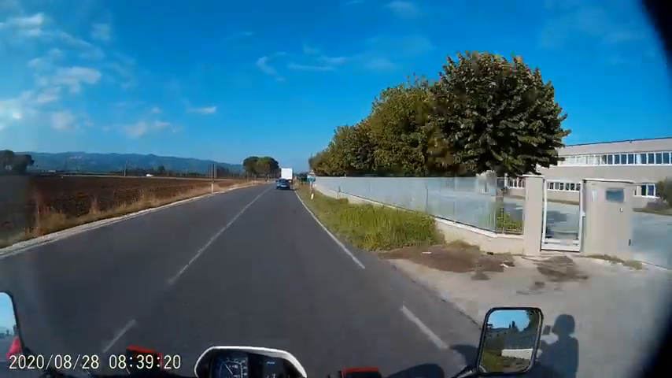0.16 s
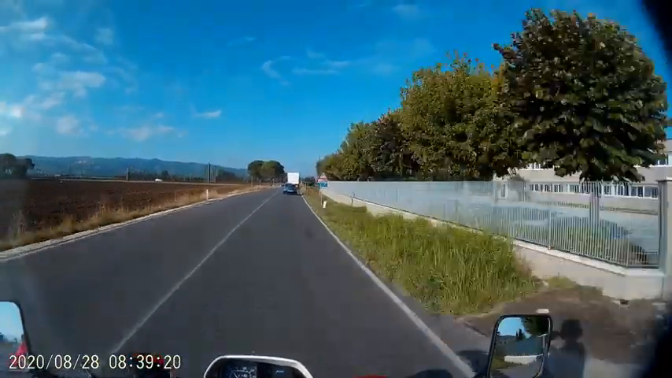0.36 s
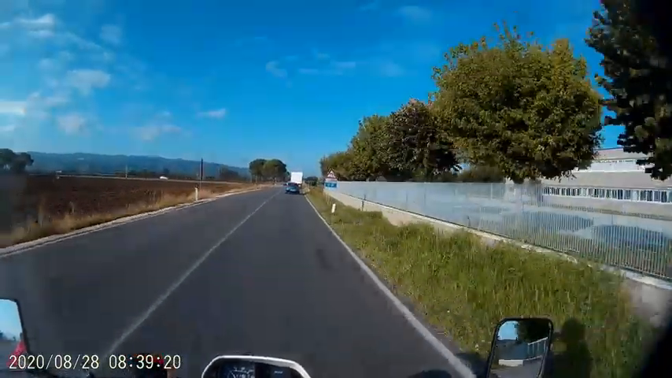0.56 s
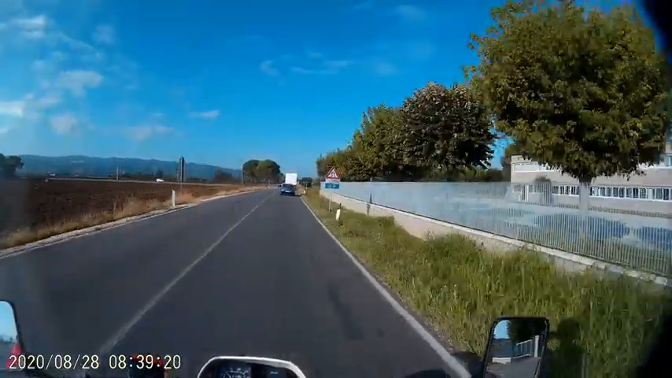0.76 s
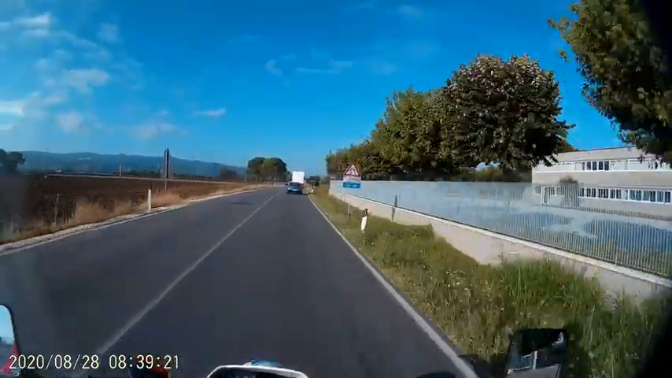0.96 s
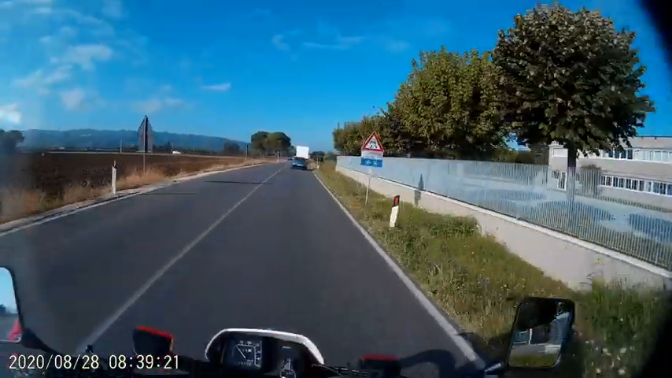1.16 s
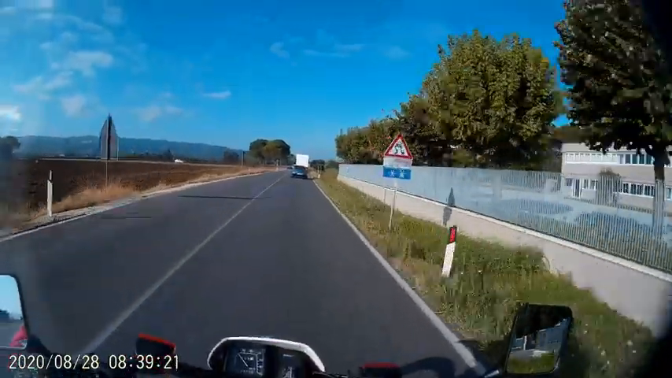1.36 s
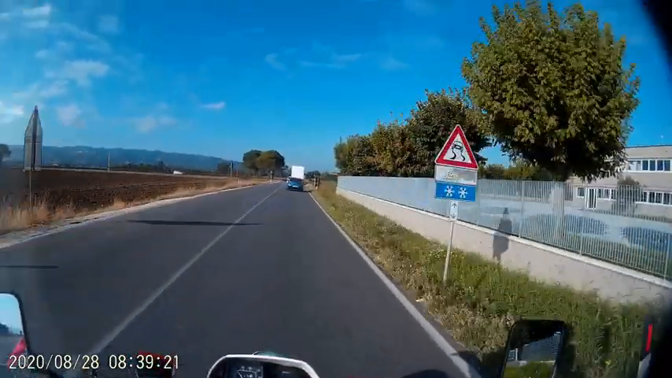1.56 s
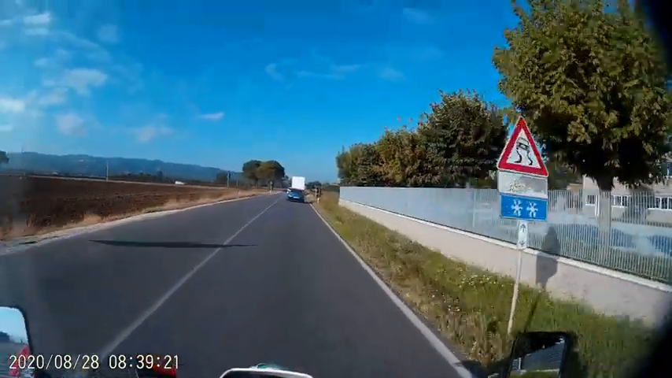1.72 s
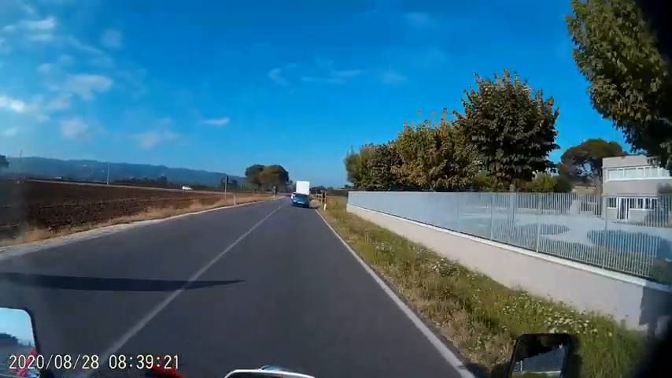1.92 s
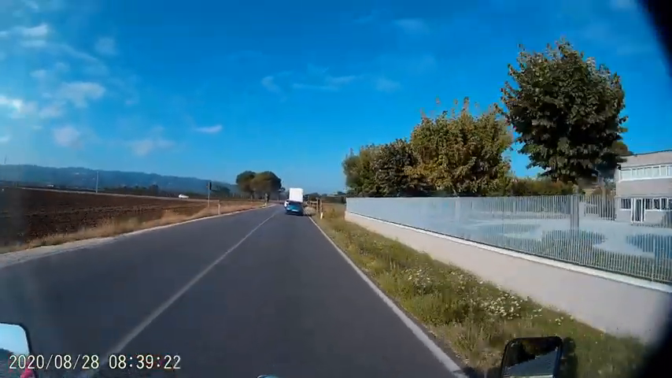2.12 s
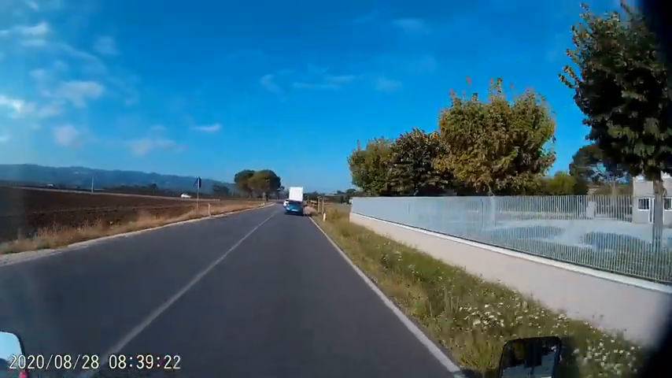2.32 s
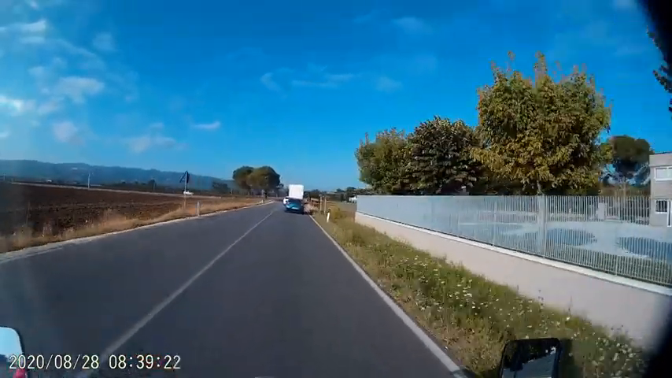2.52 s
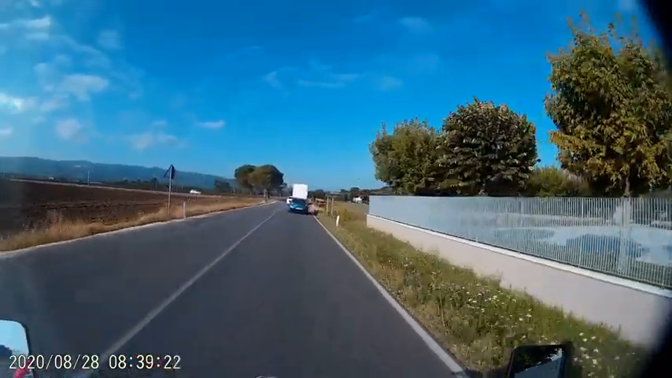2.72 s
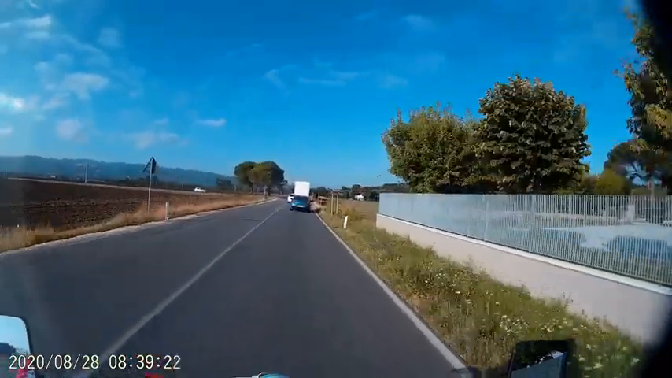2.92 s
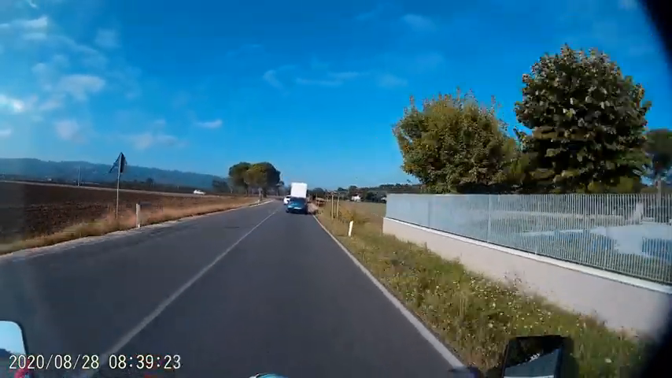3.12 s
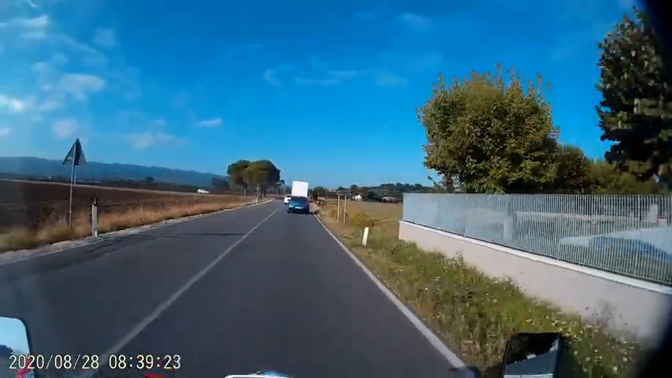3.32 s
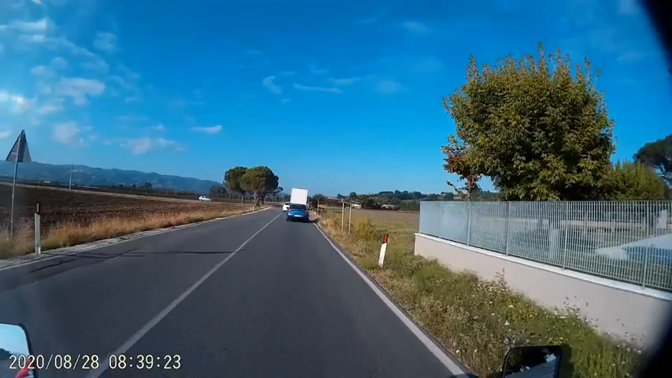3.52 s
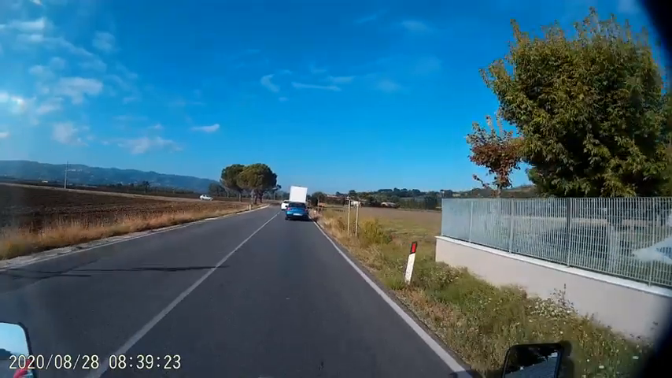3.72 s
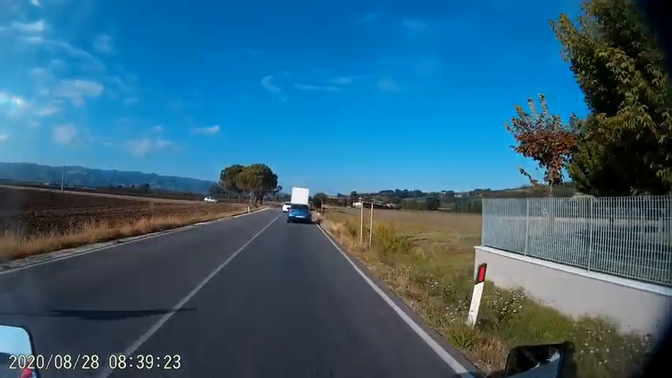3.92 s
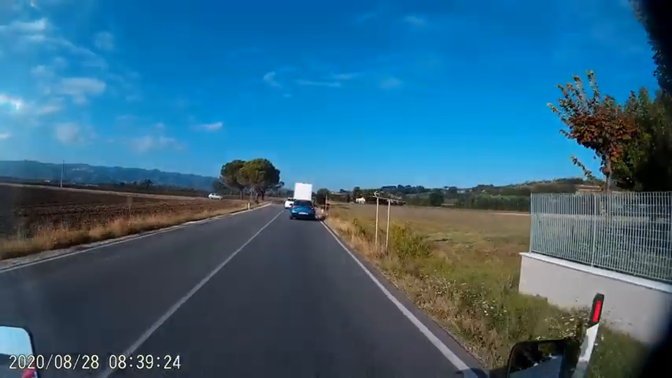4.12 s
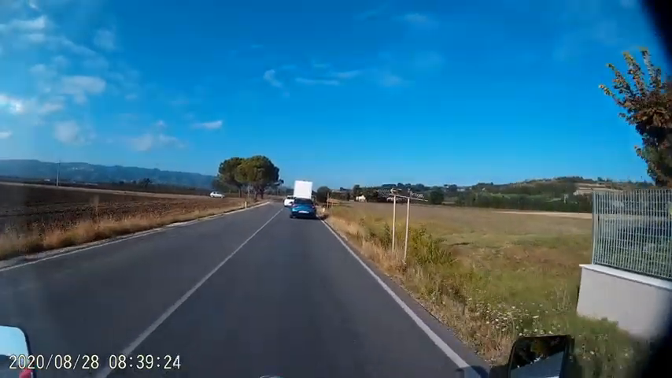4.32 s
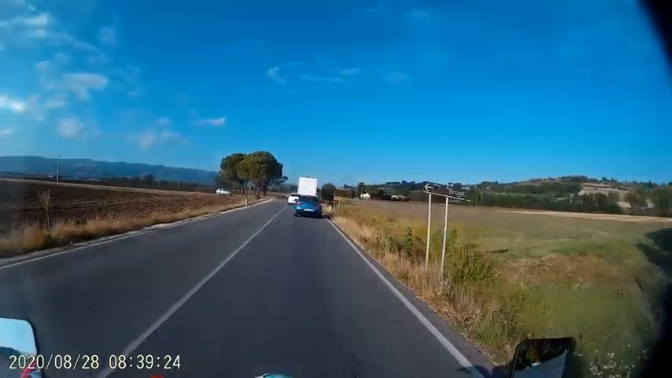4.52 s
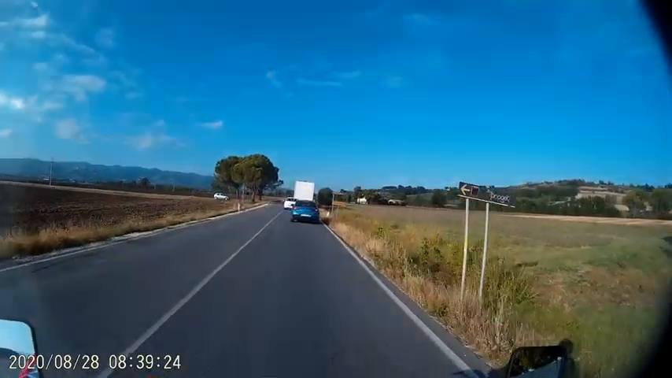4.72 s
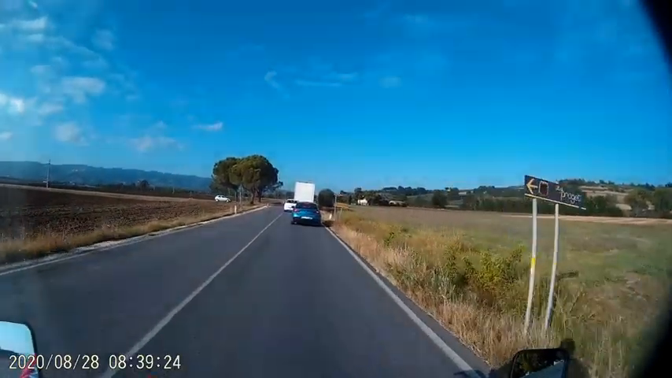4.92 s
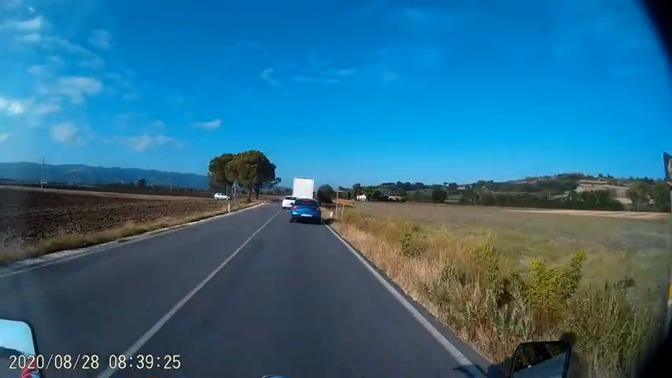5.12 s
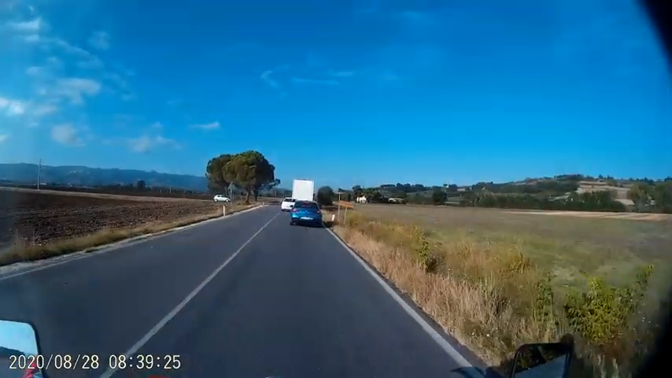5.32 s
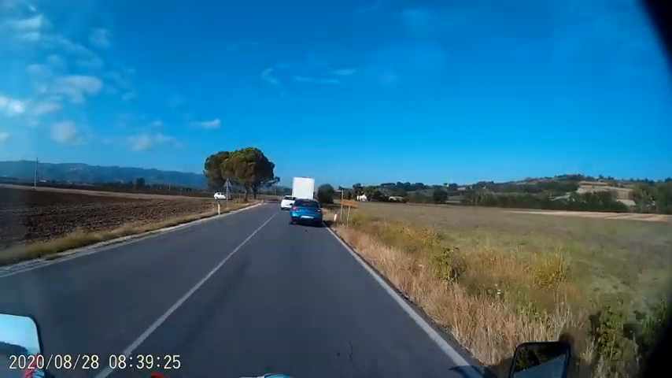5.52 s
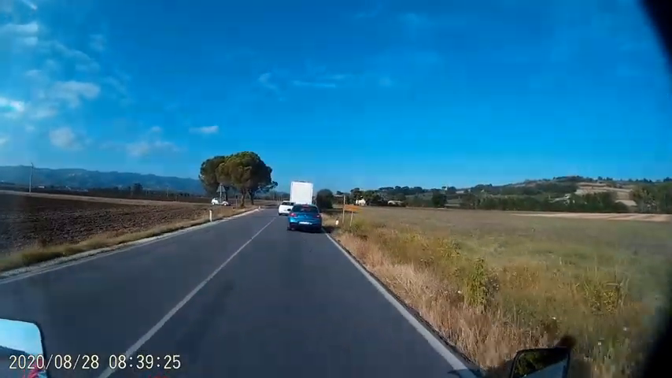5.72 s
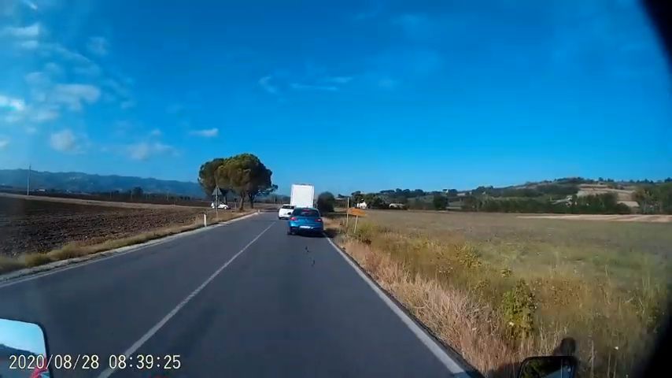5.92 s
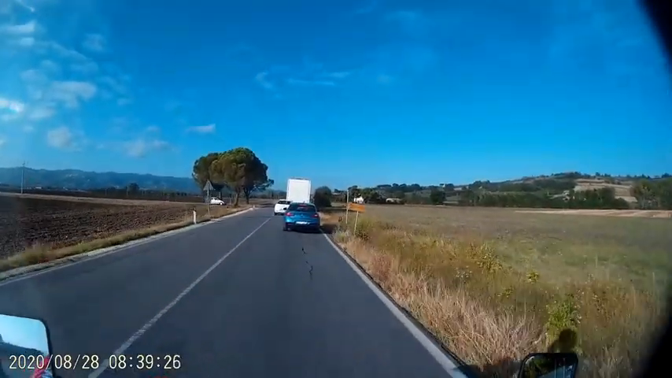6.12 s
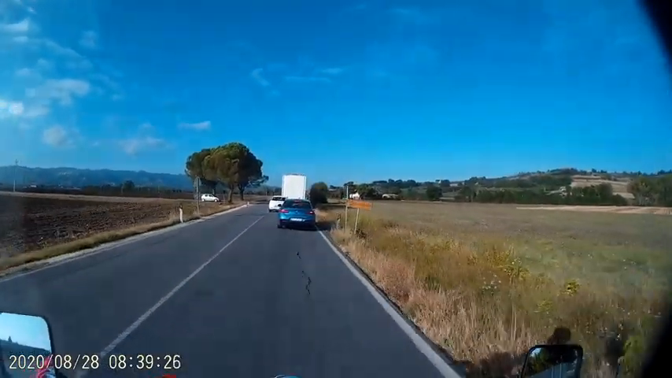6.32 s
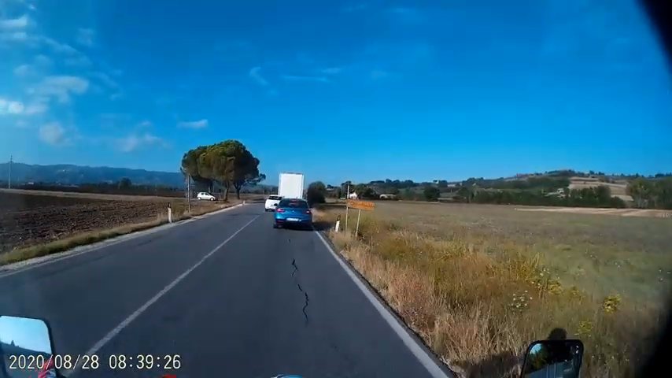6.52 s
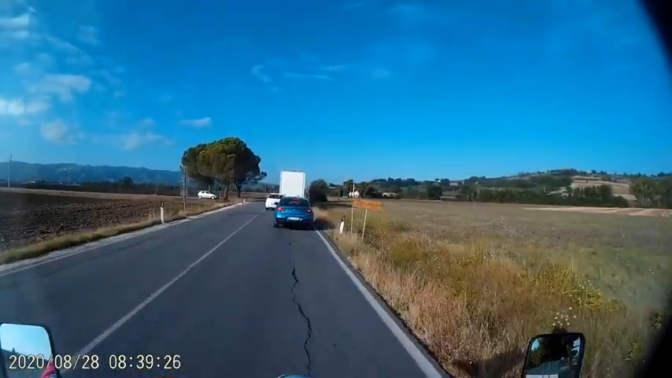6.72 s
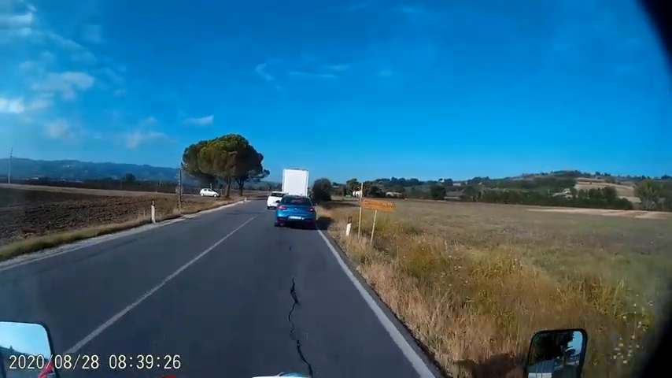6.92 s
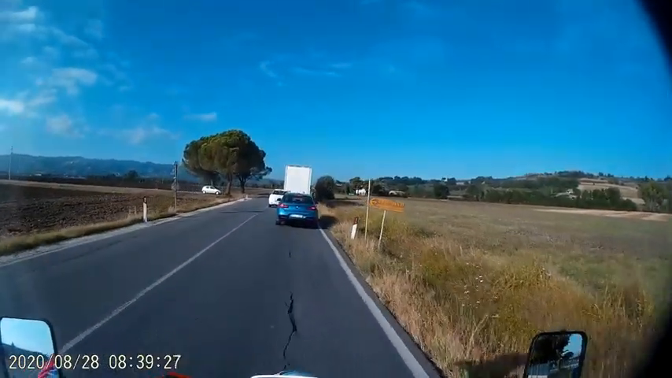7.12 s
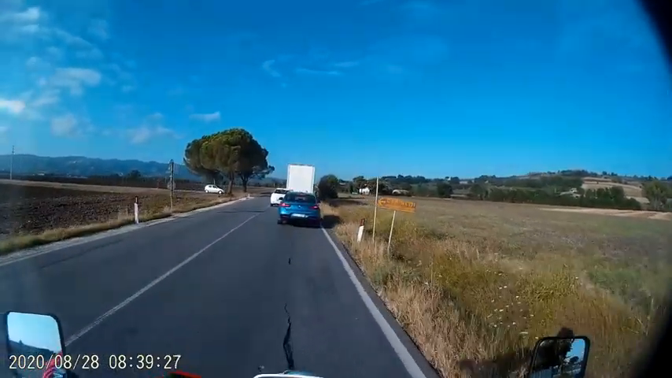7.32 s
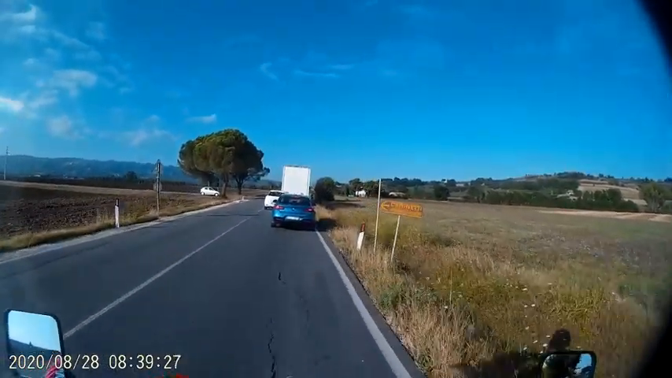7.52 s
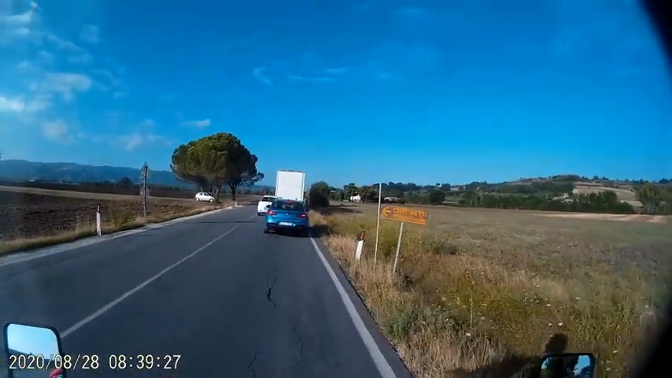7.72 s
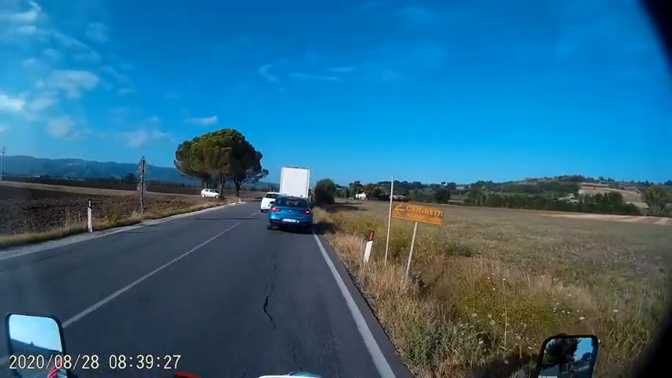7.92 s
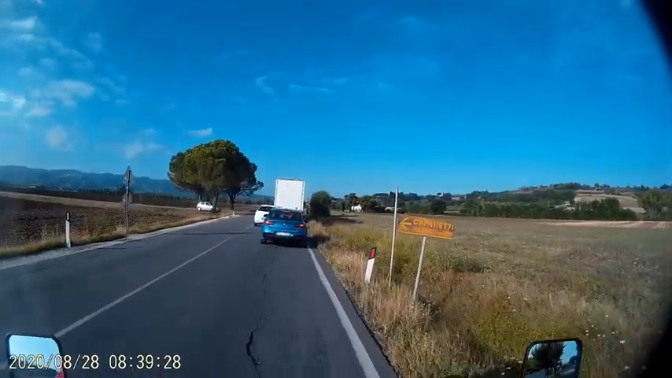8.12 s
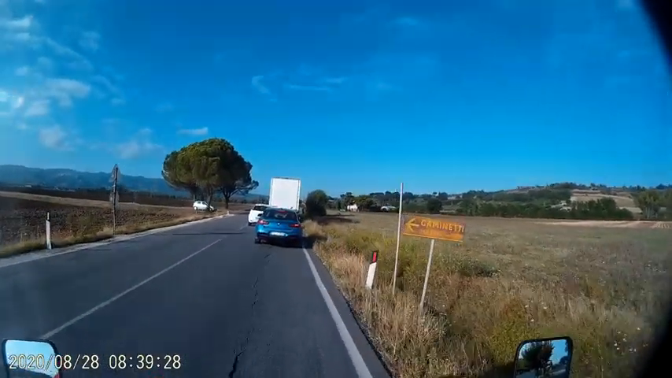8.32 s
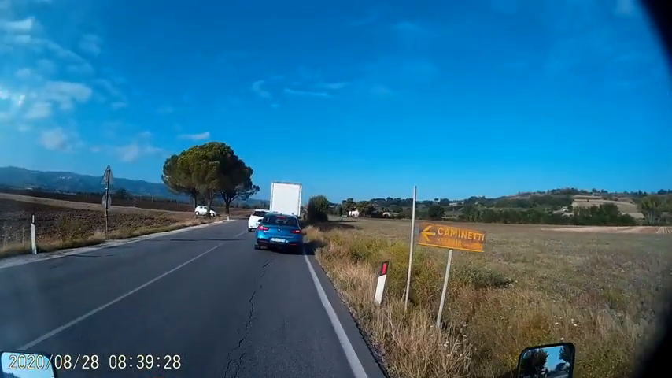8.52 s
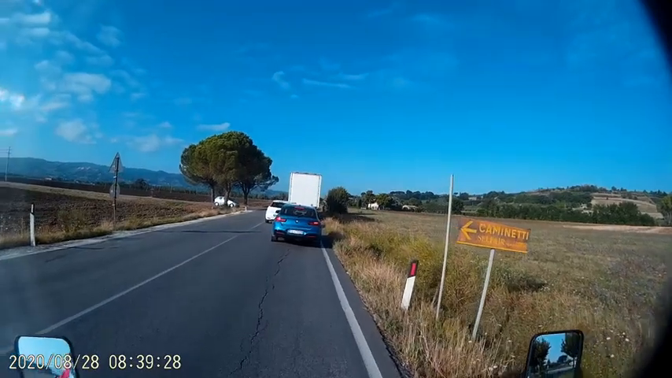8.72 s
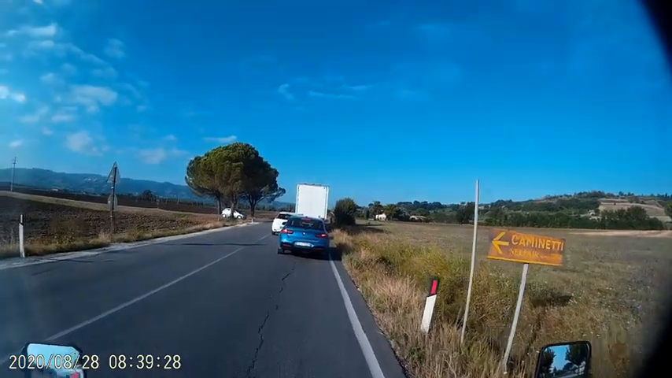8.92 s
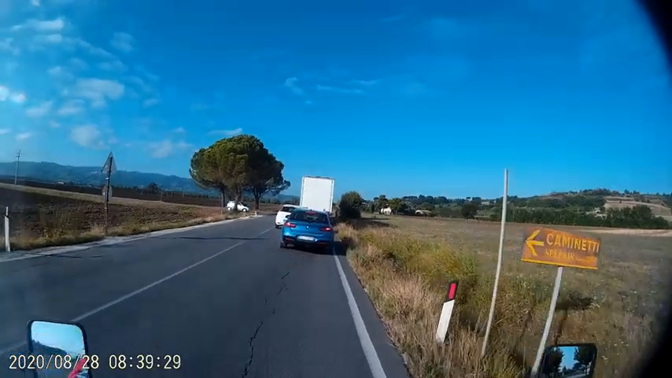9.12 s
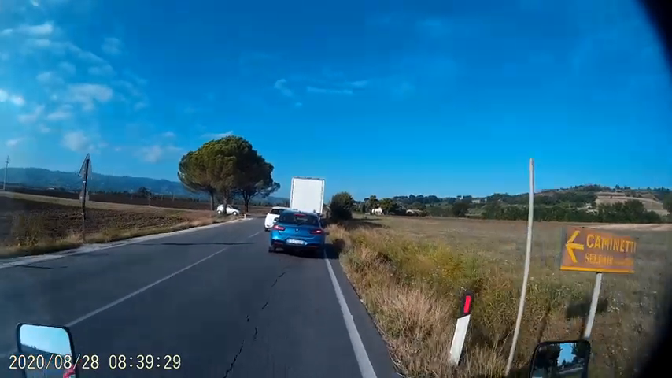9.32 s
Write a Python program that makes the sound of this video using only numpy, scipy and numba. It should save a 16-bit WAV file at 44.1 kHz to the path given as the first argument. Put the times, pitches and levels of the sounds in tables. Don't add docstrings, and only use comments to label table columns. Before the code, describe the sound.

Close, muffled and distorted wind buffeting dominates at first, gusting unevenly above a motorcycle's rapid exhaust beats and intake knocks. Midway the throttle blips, a loose lever chatters and the air calms. The bike slows outdoors to an uneven puttering idle; gear clunks ring at about six seconds and shortly after, followed by one short far horn, over faint hiss and high whine.

```python
import sys
import numpy as np
from scipy import signal
from scipy.fft import rfft, irfft, next_fast_len
from scipy.io import wavfile
from scipy.ndimage import uniform_filter1d
from numba import njit

SR = 44100
rng = np.random.default_rng(int(sys.argv[2]) if len(sys.argv) > 2 else 0)


def invert_db(level):
    return 10 ** (np.asarray(level, dtype=float) / 20)


def bounce(signal):
    frames = np.transpose(np.atleast_2d(signal))
    limited = np.clip(frames, -1, 1)
    pcm = np.round(limited * 32767).astype(np.int16)
    wavfile.write(sys.argv[1], SR, pcm)


N = 412776
T = np.arange(N) / SR
IDLE_HZ, PULL_HZ = 11, 14
CRUISE_M_S = 21.38
# time in seconds, speed in m/s.
SPEED = [(0, 22.4), (1.5, 21.2), (2.5, 20), (4, 19.4), (5, 16.6), (5.4, 15), (6.3, 12.5), (7.2, 9.6),
         (9.36, 10.1)]


def curves(table):
    s, *columns = np.transpose(table)
    return [np.interp(T, s, c) for c in columns]


def unit(x):
    return x / np.sqrt(np.mean(x ** 2))


@njit
def svf(x, hz, width):
    y, b, l = np.empty(len(x)), 0., 0.
    g, k = np.tan(np.pi * hz / SR), width / hz
    for i in range(len(x)):
        v = (b + g * (x[i] - l)) / (1 + g * (g + k))
        b, l, y[i] = 2 * v - b, l + 2 * g * v, k * v
    return y


def ring(x, hz, width_hz):
    hz, width_hz = float(hz), float(width_hz)
    once = svf(x + 1e-18, hz, width_hz)
    return svf(once, hz, width_hz) * SR * np.e / (2 * np.pi * width_hz)


def walk(rate_hz):
    hold = int(SR / rate_hz)
    levels = np.repeat(rng.standard_normal(N // hold + 1), hold)
    return 0.87 * uniform_filter1d(uniform_filter1d(levels, hold), hold)[:N]


def clicks(s, size):
    at = (np.asarray(s) * SR).astype(int)
    inside = (at >= 0) & (at < N)
    return np.bincount(at[inside], np.asarray(size)[inside], N)


def fade(x, tau_s):
    return signal.lfilter([1], [1, -np.exp(-1 / (tau_s * SR))], x)


def bumps(table):
    return sum(db * np.exp(-((T - s) / (length / 2)) ** 2 / 2) for s, length, db in table)


def muffle(x):
    return signal.sosfilt(signal.butter(3, 920, fs=SR, output="sos"), x)


def firings():
    # time in seconds, firings per second.
    revs = [(0.0, 30.824), (1.5, 29.589), (3.74, 21.458), (3.98, 15.107), (4.3, 19.647), (4.46, 17.389),
            (4.58, 17.252), (4.7, 13.364), (4.82, 13.164), (5.3, 10.844), (5.66, 10.939), (6.18, 10.151),
            (6.94, 11.103), (7.1, 10.758), (7.98, 10.553), (8.54, 11.031), (8.86, 10.154), (9.36, 10.965)]
    # time in seconds, exhaust blast in dB.
    load = [(0, -17), (.9, -13), (1.1, -9.5), (2.0, -8.5), (2.4, -11), (2.8, -8.5), (3.5, -9), (3.9, -14.5),
            (4.1, -8.5), (4.15, -1.5), (4.32, -0.5), (4.45, -10), (5.0, -16.5), (5.4, -16.5), (6.3, -17.5),
            (7.4, -15.5), (9.36, -17.5)]
    first_cycle = -.638
    pull_scatter_db, idle_scatter_db, scatter_s = 2.5, -0.5, 0.00086
    even_above_db = -4

    hz = curves(revs)[0]
    cycles = first_cycle + np.cumsum(hz) / SR
    s = np.interp(np.arange(int(cycles[-1]) + 1), cycles, T)
    load_db = np.interp(s, *np.transpose(load))
    pull = np.clip((np.interp(s, T, hz) - IDLE_HZ) / (PULL_HZ - IDLE_HZ), 0, 1)
    pull = pull * np.clip((even_above_db - load_db) / 4, 0, 1)
    time_chance, level_chance = rng.standard_normal((2, len(s)))
    scatter_db = idle_scatter_db + pull * (pull_scatter_db - idle_scatter_db)
    return s + scatter_s * pull * time_chance, load_db + scatter_db * level_chance, hz


def exhaust(s, db, hz):
    # centre in Hz, width in Hz, level in dB.
    pipe_modes = [(93.3, 85.6, 1), (260.8, 80.4, -0.5), (653, 198, -3), (341.4, 31, -14.5), (52, 58, -9.5)]
    pipe_lead_s, echo_s, echo_db = 0.00625, .026, -11
    notch_hz, notch_width_hz = 178., 85.

    boom_db = np.interp(hz, [IDLE_HZ, PULL_HZ], [-1.6, -8.5])
    boom = invert_db(boom_db)
    lift = [boom, 1, 1, 1, boom]
    blast = clicks(s - pipe_lead_s, invert_db(db))
    pipe = sum(invert_db(d) * g * ring(blast, f, w) for (f, w, d), g in zip(pipe_modes, lift))
    echo = clicks(s - pipe_lead_s + echo_s, invert_db(db))
    pipe = pipe + invert_db(echo_db + boom_db) * ring(echo, *pipe_modes[0][:2])
    return pipe - svf(pipe, notch_hz, notch_width_hz)


def intake(intake_s, hz):
    # centre in Hz, width in Hz, level in dB.
    airbox_modes = [(706, 133, -4), (621, 43, -8.5), (453, 90, -9.5)]
    knock_db, knock_db_per_hz_s, idle_knock_db = -20.5, .55, 4

    drop_hz_s = -uniform_filter1d(np.gradient(hz) * SR, SR // 2)
    idle_db = np.interp(hz, [IDLE_HZ, PULL_HZ], [idle_knock_db, 0])
    gain = invert_db(knock_db + knock_db_per_hz_s * drop_hz_s + idle_db)
    gulp = gain * clicks(intake_s, invert_db(1.4 * rng.standard_normal(len(intake_s))))
    return sum(invert_db(d) * ring(gulp, f, w) for f, w, d in airbox_modes)


def breathing(intake_s):
    # share of the cycle after the intake opens (0-1), level in dB.
    cycle_levels = [(0, 0), (.22, -4), (.28, 0), (.45, -2), (.66, -4), (.78, -9), (1, -11)]
    share = np.interp(T, intake_s, np.arange(len(intake_s))) % 1
    breath = invert_db(np.interp(share, *np.transpose(cycle_levels)))
    return breath / np.sqrt(uniform_filter1d(breath ** 2, SR // 5) + 1e-6)


def engine():
    s, db, hz = firings()
    intake_s = s - .36 * np.gradient(s) + 0.00074 * rng.standard_normal(len(s))
    return muffle(exhaust(s, db, hz) + intake(intake_s, hz)), breathing(intake_s)


def airflow():
    # time in seconds, level in dB.
    exposure = [(0, 2), (.5, -0.5), (1.4, 1), (2.1, -2), (2.6, -1), (3.2, -2), (3.6, 1), (4.1, -2.5),
                (4.6, -1), (5, -2.5), (5.15, -4.5), (5.5, -5.5), (6.5, -8.5), (7.5, -10), (9.36, -10)]
    # time in seconds, length in seconds, rise in dB.
    gust_bumps = [(0.012, 0.14, 1.5), (0.604, .08, 6), (0.765, .07, 3), (1.159, 0.15, 2),
                  (1.463, 0.042, -3), (1.71, 0.056, -3), (1.916, 0.087, 1.5), (2.022, .1, -1),
                  (2.483, 0.23, 2), (2.809, 0.022, -4), (2.898, 0.064, 2.5), (3.254, 0.053, 0.5),
                  (3.355, 0.083, 6), (3.49, 0.074, 6), (3.728, .1, 2), (4.203, 0.13, 0.5), (4.7, 0.25, 4),
                  (4.935, 0.044, 5), (5, 0.02, 3), (5.374, 0.055, -2.5)]
    # time in seconds, length in seconds, rise in dB.
    shake_bumps = [(.1, 0.15, 2), (.6, 0.068, 0), (.87, 0.12, -4.5), (1.2, 0.15, 2), (2.15, 0.28, 0),
                   (2.5, 0.18, -0.5), (3.25, 0.4, 3.5), (3.75, 0.25, -2), (4.22, 0.18, 3.5), (4.75, .25, 1),
                   (6.45, 0.16, -0.5), (7.1, 0.38, 1.5)]
    buffet_db, buffet_db_per_decade, buffet_gust, lull_db = -18, 54.5, 0.22, 1
    eddy_db_per_decade = 14
    roar_db, ring_db, ring_slope = -17.5, -35.5, 0.34
    fizz_db, fizz_slope, fizz_db_per_decade = -51.5, 0.26, 7.5
    breath_low, breath_roar, breath_ring, breath_below_m_s = .9, .7, .4, 12.3
    braking_start_s, braking_end_s, braking_db = 0.85, 3.5, 1.5

    speed = curves(SPEED)[0]
    fast = speed / CRUISE_M_S
    decades = np.log10(fast)
    gusts, shakes = bumps(gust_bumps), bumps(shake_bumps)
    stream = curves(exposure)[0] + gusts
    low = buffet_db + buffet_db_per_decade * decades + buffet_gust * gusts
    low = low + lull_db * fast * walk(17)
    eddies = low + eddy_db_per_decade * decades
    braking = 1. * (T > braking_start_s) * (T < braking_end_s)
    buzz = braking_db * uniform_filter1d(braking, SR // 8)
    case = ring_db + ring_slope * stream + buzz + shakes
    fizz = fizz_db + fizz_slope * stream + shakes + fizz_db_per_decade * decades
    calm = np.clip((breath_below_m_s - speed) / 2.2, 0, 1)
    shares = breath_low * np.clip((1 - fast) * 2.5, 0, 1), breath_roar * calm, breath_ring
    return low, eddies, roar_db + stream, case, fizz, shares


def wind(breath):
    # frequency in Hz, level in dB per Hz.
    air = [(12, -51), (22, -30.5), (48, -10), (110, -6), (180, -5.5), (260, -2.5), (700, -7), (1000, -19.5),
           (1400, -22), (2300, -28), (2600, -42.5), (4600, -51), (5300, -62), (9000, -65), (16000, -77.5)]
    # centre in Hz, width in Hz, lift in dB.
    case_modes = [(283, 23, -1), (770, 340, 6.5), (2057, 137, 11.5), (4240, 66, 7.5), (6150, 300, 5),
                  (6900, 680, 8), (9100, 340, 5.5)]

    size = next_fast_len(N, True)
    hz = np.fft.rfftfreq(size, 1 / SR) + 1e-3
    air_hz, air_db = np.transpose(air)
    colour = invert_db(np.interp(np.log(hz), np.log(air_hz), air_db))
    for f, w, db in case_modes:
        colour = colour * (1 + (invert_db(db) - 1) / (1 + (2 * (hz - f) / w) ** 2))

    low, eddies, roar, case, fizz, shares = airflow()
    groups = [(14.6, 45, eddies - 14, shares[0]), (46.7, 140, low - 5, shares[0]),
              (139.2, 215, eddies - 6, shares[0]), (211.4, 420, (low + roar) / 2 - 3, shares[1]),
              (425.6, 1050, roar - 1.5, shares[1]), (1069, 2595, case, shares[2]),
              (2568, 7900, fizz, shares[2] / 2)]
    gust, white, out = walk(9), rfft(rng.standard_normal(size)), 0
    for lo_hz, hi_hz, db, share in groups:
        flow, eddy = 0, walk(22)
        edges = np.geomspace(lo_hz, hi_hz, 5)
        for a, b in zip(edges[:-1], edges[1:]):
            band = irfft((hz >= a) * (hz < b) * white, size)[:N]
            flow = flow + band * invert_db(0.63 * walk(14))
        share = np.clip(share, 0, 1)
        flow = flow * invert_db(0.75 * gust + 0.96 * eddy) * (1 - share + share * breath)
        out = out + invert_db(db) * unit(irfft(colour * rfft(flow, size), size)[:N])
    return out


def slaps():
    # time in seconds, crack in dB, push in dB.
    jumps = [(0.002, -35.5, -20), (0.2296, -49.5, -3), (0.5966, -42.5, -3.5), (0.622, -36, -8),
             (0.6726, -46, -2), (0.7707, -48, -1.5), (1.073, -47, -4.5), (1.1339, -54, -12),
             (1.1977, -42.5, -5.5), (1.233, -43, -6), (1.303, -44.5, -18), (1.9168, -41.5, -7),
             (1.965, -42, -14), (2.157, -43, -3.5), (2.4861, -51.5, -7.5), (2.5517, -49.5, -7.5),
             (2.6478, -50, -3), (2.6719, -46, -2), (3.2548, -40.5, -14), (3.3233, -44.5, -6),
             (3.384, -42, -8), (3.4269, -47.5, -14), (3.4764, -42.5, -5), (3.5114, -40, -5.5),
             (3.6473, -54.5, -6.5), (3.962, -40.5, -3), (4.0312, -45, -9), (4.205, -44, -7),
             (4.262, -39, -7), (4.312, -44, -8.5)]
    s, crack_db, push_db = np.transpose(jumps)
    sign = np.sign(rng.standard_normal(len(s)))
    crack = fade(clicks(s, -sign * invert_db(crack_db + 13)), .00004)
    push = clicks(s - .001, sign * invert_db(push_db + 1.5))
    return crack + muffle(ring(push, 600, 500))


def hiss():
    # start in seconds, length in seconds.
    swell_spans = [
        (0, .05),
        (0.354, 0.14),
        (1.368, .16),
        (2.363, 0.12),
    ]
    hiss_db, duck_db, swell_db, swell_hz = -67.3, -1.8, -68, 6000

    swell = sum(1. * (T > s) * (T < s + length) for s, length in swell_spans)
    swell = uniform_filter1d(swell, SR // 50)
    high_pass = signal.butter(2, swell_hz, "high", fs=SR, output="sos")
    treble = signal.sosfilt(high_pass, rng.standard_normal(N))
    duck = duck_db * np.clip(2 * curves(SPEED)[0] / CRUISE_M_S - 1, 0, 1)
    return invert_db(hiss_db + duck) * rng.standard_normal(N) + invert_db(swell_db) * swell * treble


def whine():
    # time in seconds, level in dB.
    whine_levels = [(0, -80.5), (3.3, -78), (4.7, -67), (9.36, -66.5)]
    return np.sqrt(2) * invert_db(curves(whine_levels)[0]) * np.sin(2 * np.pi * 6804 * T)


def lever_chatter():
    # start in seconds, hold in seconds, decay in seconds, level in dB.
    chatter = [
        (3.93, .2, .03, -61),
        (4.46, 0.22, .17, -59),
    ]
    attack_s, flicker_db = 0.028, 4.5
    rattle = unit(ring(rng.standard_normal(N) * invert_db(flicker_db * walk(70)), 6950, 600))
    shake = 0
    for s, hold, decay, db in chatter:
        attack = np.clip((T - s) / attack_s, 0, 1)
        shake = shake + invert_db(db) * attack * np.exp(-np.maximum(T - s - hold, 0) / decay)
    return shake * rattle


def gear_clunks():
    # time in seconds, peak in dB, rattle length in seconds, treble in dB.
    clunks = [
        (5.947, -19.5, 0.0072, -9),
        (5.955, -13.5, 0.0036, -12),
        (5.971, -15, 0.0041, -12),
        (6.622, -19, 0.022, -8),
        (6.635, -17.5, 0.0069, 0),
        (6.639, -34, 0.0063, 2),
    ]
    # centre in Hz, width in Hz, level in dB.
    housing = [(660, 360, 3.5), (1280, 400, -5.5), (1990, 370, -6), (3140, 1700, -26), (6600, 3400, -43)]
    grit = rng.standard_normal(N)
    dull = sum(fade(clicks([s], [invert_db(db)]), tau) for s, db, tau, _ in clunks) * grit
    bright = sum(fade(clicks([s], [invert_db(db + top_db)]), tau) for s, db, tau, top_db in clunks) * grit
    out = 0
    for f, w, db in housing:
        source = bright if f > 2000 else dull
        out = out + invert_db(db) * ring(source, f, w) * np.sqrt(w / SR) * 1.3
    return out


def horn():
    # multiple of the pitch, level in dB.
    harmonics = [(1, -50), (2, -54), (3, -39), (4, -35.5), (5, -60), (6, -59), (7, -70), (9, -62)]
    pitch_hz, start_s, full_s, end_s = 506.8, 7.14, 7.2, 7.385
    blow = np.interp(T, [start_s, start_s + .01, full_s, end_s, end_s + .02], [0, 0.15, 0.85, 0.55, 0])
    phase = 2 * np.pi * np.cumsum(pitch_hz * (1 + 0.001 * walk(11))) / SR
    return blow * sum(np.sqrt(2) * invert_db(d) * np.sin(k * phase) for k, d in harmonics)


def scene():
    motor, breath = engine()
    air = wind(breath) + slaps()
    electronics = hiss() + whine()
    return (motor + air + electronics + lever_chatter() + gear_clunks() + horn())[None]


def band_limit(x):
    return signal.sosfilt(signal.butter(12, 15830, fs=SR, output="sos"), x)


def record(dry):
    clip = .69
    return band_limit(np.clip(dry, -clip, clip))


dry = scene()
out = record(dry)
bounce(out)
```